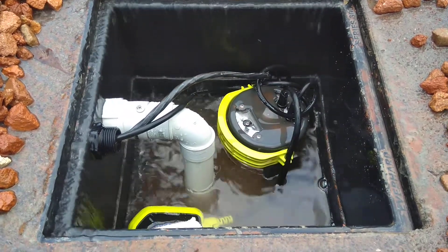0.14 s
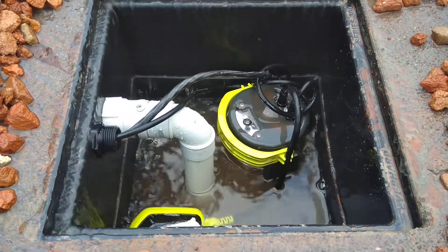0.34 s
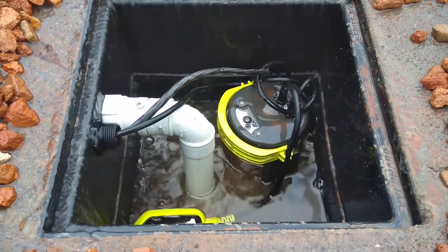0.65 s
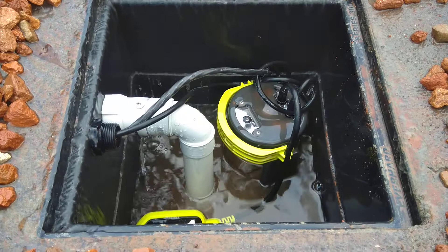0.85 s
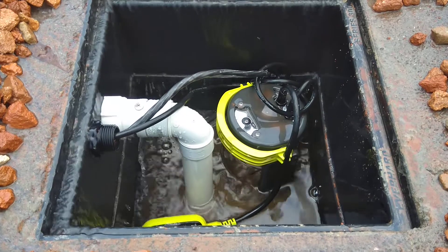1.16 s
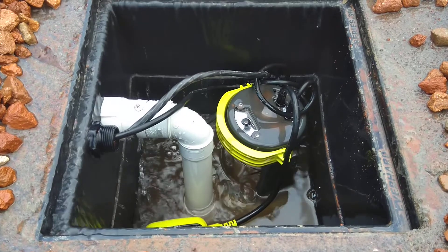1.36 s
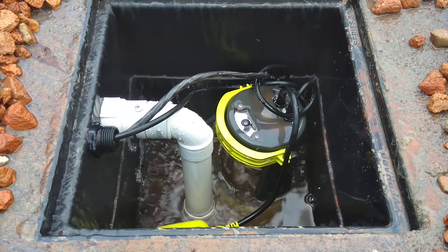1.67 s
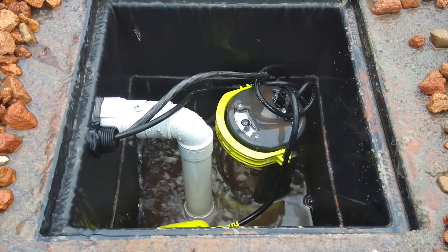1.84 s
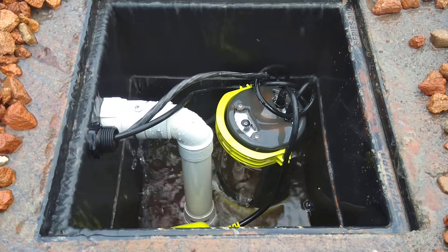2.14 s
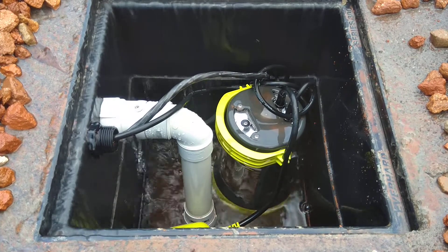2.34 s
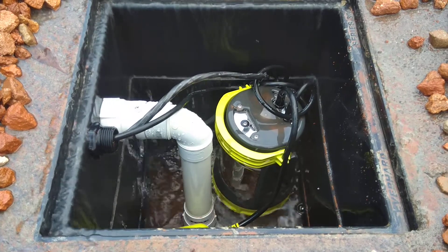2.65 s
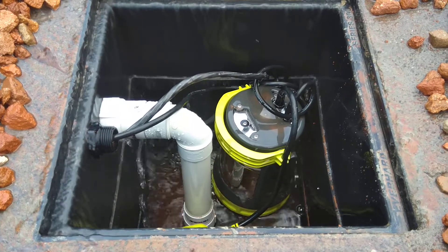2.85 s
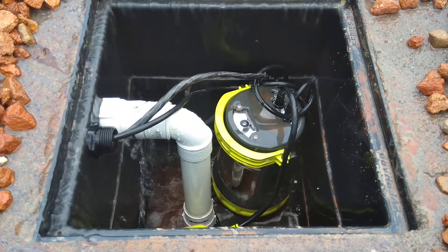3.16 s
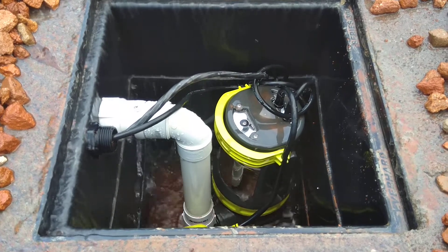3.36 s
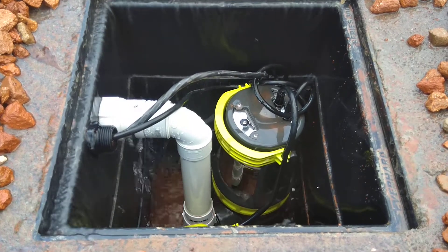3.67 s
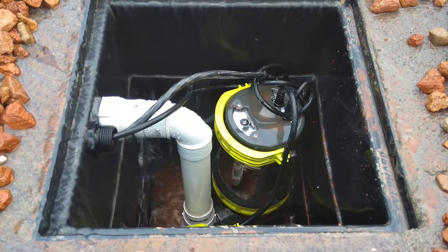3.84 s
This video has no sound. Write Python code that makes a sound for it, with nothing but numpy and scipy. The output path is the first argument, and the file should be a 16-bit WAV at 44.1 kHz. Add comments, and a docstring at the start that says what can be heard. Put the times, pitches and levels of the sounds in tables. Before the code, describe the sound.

A submersible pump drains a narrow pit: low wavering hum, steady watery rush, hiss and spitting drops, occasional deep gurgles, then gulping air and a wet rattle at the end; close stereo microphones above.

```python
"""Pump emptying a pit

A submersible pump empties a narrow concrete pit, heard from above by a close pair of microphones.
The impeller hums as wavering sines and the pit booms as resonant noise, louder as the water sinks.
Churned water rushes in flickering noise bands; big bubbles gurgle as rising rings, small drops spit
as short noisy rings. At the end the inlet gulps air: the hum drops, a wet rattle starts."""
import sys
import numpy as np
from scipy import signal
from scipy.fft import rfft, irfft
from scipy.io import wavfile

SR = 44100
rng = np.random.default_rng(int(sys.argv[2]) if len(sys.argv) > 2 else 0)


def volts_from_decibels(level):
    """Turn decibel levels (scalar or array-like) into linear amplitude factors."""
    exponent = np.asarray(level, float) / 20
    return 10 ** exponent


def dump(signal):
    """Clip the signal to [-1, 1] and save it as 16-bit WAV at the path in sys.argv[1]."""
    limited = np.clip(np.atleast_2d(signal).T, -1, 1)
    pcm = np.round(limited * 32767).astype(np.int16)
    wavfile.write(sys.argv[1], SR, pcm)


N = 176400

# Spectrum of the low rush of water. Each row: frequency in Hz, relative density in dB per Hz.
RUSH_SPECTRUM = [(180, -31), (300, -10.5), (383, -9), (510, -6.5), (668, -5), (988, -3), (1230, -9),
                 (1590, -6.5), (2400, -23), (3120, -21), (5280, -120)]
# Spectrum of the fizz near 3 kHz. Each row: frequency in Hz, relative density in dB per Hz.
FIZZ_SPECTRUM = [(1180, -59), (2000, -1.5), (2410, 1), (2980, 1.5), (3240, 4), (4300, 6.5), (5590, -17),
                 (9460, -120)]
# Spectrum of the hiss of water. Each row: frequency in Hz, relative density in dB per Hz.
HISS_SPECTRUM = [(2350, -19), (4000, -9.5), (4760, -3), (5220, -7.5), (6700, -5.5), (7660, -33),
                 (8910, -8.5), (10100, -17), (13200, -0.5), (15100, -15.5), (16000, -17)]
# Lead of the left microphone over the right. Each row: frequency in Hz, lead in seconds.
LEFT_LEAD_S = [(60, .00008), (170, .0002), (600, .00023), (1100, .00025), (2000, .00039), (15000, .00038)]


def rms_one(x):
    """Scale to rms 1."""
    return x / np.sqrt(np.mean(x ** 2) + 1e-20)


def in_time(rows):
    """Columns of a curve table at every sample."""
    s, *columns = np.transpose(rows)
    return [np.interp(np.arange(N) / SR, s, c) for c in columns]


def at_hz(points, hz):
    """Read a table on a log-frequency axis."""
    table_hz, values = np.transpose(points)
    return np.interp(np.log(hz), np.log(np.maximum(table_hz, 1)), values)


def drift(rate_hz):
    """Slow random curve of rms 1: noise at SR / 40 through a two-pole low-pass, interpolated."""
    r = np.exp(-80 * np.pi * rate_hz / SR)
    noise = rng.standard_normal(N // 40 + 2002)
    slow = signal.lfilter([1], [1, -2 * r, r * r], noise)[2000:]  # settled part
    return np.interp(np.arange(N) / 40, np.arange(len(slow)), rms_one(slow))


def resonance(x, hz, width_hz):
    """Two-pole resonance."""
    r = np.exp(-np.pi * width_hz / SR)
    poles = [1, -2 * r * np.cos(2 * np.pi * hz / SR), r * r]
    return signal.lfilter([1 - r, 0, r - 1], poles, x + 1e-18)


def pair(near, apart=0):
    """Two microphones: the direct share reaches the left first, the rest is unrelated; balance by pitch."""
    # Power share from the water's side. Each row: frequency in Hz, share.
    direct_share = [(60, 1.), (250, 0.97), (500, 0.94), (1000, 0.69), (2000, 0.057), (4500, 0.057),
                    (8000, 0.023), (15000, 0.042)]
    # Balance of the microphones. Each row: frequency in Hz, left minus right in dB.
    left_minus_right_db = [(60, 0), (125, .5), (250, 1.7), (500, 4), (1000, 4.3), (2000, 3.3), (4000, 2.4),
                           (8000, -.2), (15000, .4)]
    hz = np.maximum(np.arange(N // 2 + 1) * SR / N, 1)
    share = np.clip(at_hz(direct_share, hz), 0, 1) if np.ndim(apart) else 1
    lag = np.exp(-2j * np.pi * hz * at_hz(LEFT_LEAD_S, hz) * np.array([[0], [1]]))
    both = np.sqrt(share) * rfft(near) * lag
    both = both + np.sqrt(1 - share) * rfft(apart + np.zeros((2, N)))
    return irfft(both * volts_from_decibels(at_hz(left_minus_right_db, hz) * np.array([[.5], [-.5]])), N)


def banded_noise(spectrum, patchy_db, shared, surge_db=0):
    """Noise bands about a third-octave wide, flickering partly together, surging apart; rms 1."""
    out, together = 0, drift(14.0)
    low_hz, high_hz = max(spectrum[0][0], 20), min(spectrum[-1][0], 18000)
    edges = np.geomspace(low_hz, high_hz, int(3 * np.log2(high_hz / low_hz)) + 2)
    white = rng.standard_normal((2, 3, N))  # neighbouring bands use different noise
    for k, (low, high) in enumerate(zip(edges, edges[1:])):
        band_pass = signal.butter(2, [low, high], "band", fs=SR, output="sos")
        band = signal.sosfilt(band_pass, white[k % 2])
        flicker_db = patchy_db * (shared * together + drift(27.0))
        level_db = at_hz(spectrum, np.sqrt(low * high)) + flicker_db + surge_db * drift(3.6)
        out = out + band * volts_from_decibels(level_db)
    return rms_one(pair(out[0], out[1:]))


def grains(per_s, low_hz, high_hz, cycles, spread_db, spectrum):
    """Random bubbles ringing a few cycles at 20 pitches spread over a range; rms 1."""
    sizes = volts_from_decibels(spread_db * np.minimum(rng.exponential(1, N), 3)) * rng.choice([-1, 1], N)
    born = rng.random(N) < per_s * volts_from_decibels(3.0 * drift(8.0)) / SR
    dealt, out = rng.integers(0, 20, N), 0
    for k, hz in enumerate(np.geomspace(low_hz, high_hz, 20)):
        ring = resonance(sizes * born * (dealt == k), hz, 0.87 * hz / cycles)
        out = out + volts_from_decibels(at_hz(spectrum, hz)) * np.sqrt(hz) * ring
    return rms_one(out)


def rings(x, flicker_db=0):
    """Parallel resonances of pipe and pit, each swelling and fading on its own by flicker_db."""
    # Pipe and pit rings. Each row: frequency in Hz, width in Hz, relative level in dB.
    pit_rings = [(518, 160, -0.5), (765, 41, -1.5), (1037, 100, -1), (1336, 95, 0.5), (1620, 180, -5),
                 (2408, 73, -13)]
    out = 0
    for k, (hz, width_hz, db) in enumerate(pit_rings):
        gain = (-1) ** k * volts_from_decibels(db + flicker_db * drift(5.2)) / np.sqrt(width_hz)
        out = out + gain * resonance(x, hz, width_hz)
    return out


def pit(x):
    """Short flutter between the close walls, other paths for each side."""
    hz = np.arange(N // 2 + 1) * SR / N
    lags_s = rng.uniform(.002, .007, (2, 5, 1))
    # t60 0.05 s at low frequencies, shorter in the treble
    loop = volts_from_decibels(-60 * lags_s / .05) * np.exp(-2j * np.pi * hz * lags_s) / (1 + 1j * hz / 9000)
    echoes = np.sum(loop / (1 - loop), axis=1) * hz / (hz + 700)
    return volts_from_decibels(-7) * irfft(rfft(x) * echoes, N) / 2


def rumble():
    """Low noise bands of varying level over a steady deep bed."""
    # Low rumble. Each row: frequency in Hz, relative density in dB per Hz.
    low_spectrum = [(90, -25), (120, -5.5), (150, 0), (250, -4.5), (330, -9), (450, -55)]
    # Its course. Each row: time in seconds, level in dB.
    low_course = [(0.0, -29.5), (0.12, -35.5), (1.54, -28), (1.85, -29.5), (2.24, -26), (2.57, -27.5),
                  (4.0, -37)]
    # Deep rumble. Each row: frequency in Hz, relative density in dB per Hz.
    deep_spectrum = [(20, -26), (40, -11), (60, -2), (80, -3.5), (110, 0.5), (140, -2)]
    out = volts_from_decibels(in_time(low_course)[0]) * banded_noise(low_spectrum, patchy_db=2.2, shared=.5)
    return out + volts_from_decibels(-37.5) * banded_noise(deep_spectrum, patchy_db=1.5, shared=0.28, surge_db=1.0)


def churned_water(low_db, mid_db, high_db):
    """Rush, fizz and hiss as flickering noise; rush and fizz also surge slowly band by band."""
    surge_db = 1.94
    out = volts_from_decibels(low_db) * banded_noise(RUSH_SPECTRUM, patchy_db=2.0, shared=0.81, surge_db=surge_db)
    out += volts_from_decibels(mid_db) * banded_noise(FIZZ_SPECTRUM, patchy_db=3.5, shared=0.18, surge_db=surge_db)
    return out + volts_from_decibels(high_db) * banded_noise(HISS_SPECTRUM, patchy_db=1.48, shared=0.74)


def ringing_rush(low_db):
    """Rush heard through the pipe and pit rings: white noise into the resonances."""
    return volts_from_decibels(low_db - 6) * rms_one(rings(rng.standard_normal(N), flicker_db=3))


def gurgles(low_db):
    """Small bubbles: random rings in the rush band."""
    return volts_from_decibels(low_db - 7) * grains(150, 362, 2360, cycles=24.6, spread_db=3.0, spectrum=RUSH_SPECTRUM)


def spits(mid_db, high_db):
    """Droplets and fine crackle: short random rings in the fizz and hiss bands."""
    spit_db = -7.5  # against the fizz or hiss
    droplets = grains(160, 3660, 7120, cycles=14.5, spread_db=8.0, spectrum=HISS_SPECTRUM)
    crackle = grains(500, 7000, 14000, cycles=4.0, spread_db=4.0, spectrum=HISS_SPECTRUM)
    lower = grains(95, 2460, 4860, cycles=27.0, spread_db=3.5, spectrum=FIZZ_SPECTRUM)
    return volts_from_decibels(high_db + spit_db) * droplets + volts_from_decibels(high_db - 8) * crackle + volts_from_decibels(mid_db + spit_db) * lower


def squeaks():
    """Air squeezing through the water: narrow glides, their level wavering at random."""
    # Each row: start in seconds, length in seconds, peak in dB before the waver, from Hz, to Hz.
    glides = [(.8, 0.11, -37.5, 5260, 3980), (1.2, 0.075, -30, 4950, 4590), (3.53, 0.045, -37, 4340, 4120)]
    out, t, waver = 0, np.arange(N) / SR, resonance(rng.standard_normal(N), 60, 150)
    for s, length_s, db, from_hz, to_hz in glides:
        part = np.clip((t - s) / length_s, 0, 1)
        phase = 2 * np.pi * np.cumsum(from_hz + (to_hz - from_hz) * part) / SR
        out = out + volts_from_decibels(db) * np.sin(np.pi * part) * np.sin(phase)
    return out * (1 + 1.2 * rms_one(waver))


def drops():
    """Drops and splashes: each a short noisy ring around its pitch with a broad crack."""
    # Each row: start in seconds, relative level in dB, frequency in Hz,
    # pan in dB (+ left, scaled per side below), noise ring t60 in seconds, crack gain in dB.
    drop_rows = [(0.0158, -8.5, 11700, 5, 0.012, -2), (0.0444, -17.5, 2360, 2, 0.042, 0),
                 (0.0667, -19, 5030, 6, 0.034, -4), (0.2128, -19, 6130, 7, 0.02, 3),
                 (0.3092, 0, 5325, 6.5, 0.028, -5.5), (0.7906, -10.5, 5460, 4, 0.012, -5),
                 (0.8758, -21, 4170, 1.0, 0.028, -4), (0.9365, -16.5, 10120, 0, 0.033, -7),
                 (0.9427, -16, 4400, 2, 0.03, -3), (0.956, -14, 4240, 5, 0.024, 0),
                 (0.998, -11.5, 6080, 11.5, 0.024, -6), (1.017, -19, 4440, 1, 0.038, 6),
                 (1.026, -19, 5540, 13, 0.035, -4), (1.044, -15.5, 4580, 1, 0.035, 5),
                 (1.0584, -23, 4430, -1, 0.03, 8), (1.096, -20, 5490, 13, 0.024, -4),
                 (1.148, -13, 10300, 0.5, 0.023, -4), (1.1896, -24.5, 4900, 5, 0.024, 16.5),
                 (1.285, -15, 2370, 0.5, 0.039, 3), (1.3708, -14.5, 4210, 1, 0.027, -6),
                 (1.403, -19, 4720, 0, 0.021, 6.5), (1.529, -17, 11100, 5, 0.028, 0),
                 (1.5795, -11, 7750, -3, 0.016, -2), (1.6109, -9.5, 4070, 7.5, 0.037, -8),
                 (1.7833, -32, 4090, 1, 0.024, 20), (1.923, -11.5, 2790, 2.5, 0.031, -4),
                 (1.9397, -8, 4800, 1, 0.027, -12), (2.229, -19, 4230, 5, 0.068, 1),
                 (2.2584, -7.5, 3240, 2.5, 0.03, 1), (2.262, 6, 4450, 8.5, 0.01, -28),
                 (2.2923, -21.5, 4080, 13.5, 0.03, -11), (2.317, -21, 4440, 11, 0.026, -2),
                 (2.379, -19, 4190, 12, 0.03, -1), (2.4627, -16, 4530, 5.5, 0.03, 1),
                 (2.5674, -12.5, 4600, 4, 0.031, -5), (2.661, -15, 4390, 5, 0.027, -1),
                 (2.7273, -20, 3350, 4, 0.03, 3), (2.937, -15.5, 4670, 0.0, 0.027, 6),
                 (3.097, -27, 4650, 1, 0.02, 18), (3.162, -3.5, 5140, 0, 0.027, 1.5),
                 (3.244, -19, 3300, 12, 0.039, -2), (3.2947, 1, 5620, -3, 0.011, -4),
                 (3.8792, -16, 2520, -2, 0.064, -3), (3.961, -14, 2430, -1, 0.058, -6),
                 (3.8757, -11.5, 3180, 9, 0.044, -6), (3.898, -8, 4390, 3, 0.076, -19),
                 (3.9122, -11.5, 2360, 1, 0.059, -1), (3.9611, -1.5, 5260, 1, 0.031, -6),
                 (3.968, -6, 5130, -1, 0.048, -3), (3.9944, -19.5, 10400, 3, 0.025, 11)]
    width, swell_s, crack_t60_s = 0.15, 0.0004, 0.0037  # width as a share of the pitch
    out, t = np.zeros((2, N + SR)), np.arange(SR // 10) / SR
    noises = rng.standard_normal((len(drop_rows), len(t)))
    for (s, db, hz, pan_db, t60_s, crack_db), noise in zip(drop_rows, noises):
        ring = rms_one(resonance(resonance(noise, hz, width * hz), hz, 2 * width * hz))
        crack = volts_from_decibels(crack_db - 60 * t / crack_t60_s) * resonance(noise, 6900, 11600)
        tone = .9 * np.sin(2 * np.pi * hz * t) * volts_from_decibels(-30 * t / t60_s)  # dies faster than the noise
        decay = volts_from_decibels(-60 * t / t60_s) * (1 - np.exp(-t / swell_s))
        burst = (tone + .45 * ring) * decay + crack
        for side, lag_s, pan_scale in ((0, 0.0024, 0.7), (1, LEFT_LEAD_S[-1][1], -0.88)):
            i = int((s + lag_s) * SR)
            out[side, i:i + len(t)] += volts_from_decibels(db - 2.0 + pan_scale * pan_db) * burst
    return out[:, :N]


def gulps():
    """Each is a bubble rising in pitch, a weaker neighbour just after, and a slap that rings the pipe."""
    # Big bubbles bursting. Each row: start in seconds, relative level in dB, starting pitch in Hz,
    # relative level of the surface slap in dB.
    bursts = [(.616, -17, 1210, -19.5), (.757, -24, 616, -18.5), (.765, -18, 1750, -13),
              (.867, -13, 690, -21), (1.396, -12, 626, -21), (1.408, -20, 1110, -17),
              (1.484, -3.5, 272, -32), (1.485, -9.5, 512, -16), (1.495, -15, 885, -28),
              (1.5, -11.5, 344, -26), (1.51, -17, 666, -32), (1.796, -15, 517, -19), (1.987, -16, 575, -23),
              (2.171, -1, 477, -35), (2.181, -6, 577, -35), (2.199, -8, 680, -22), (2.265, -10, 1580, -39),
              (2.265, -12.5, 700, -8.5), (2.268, -11.5, 260, -9), (2.979, -25, 1280, -11.5),
              (2.988, -25, 600, -10), (3.241, -16, 1190, -34), (3.711, -15, 790, -25),
              (3.78, -5.5, 485, -10.5), (3.796, -10, 478, -31), (3.822, -9.5, 895, -15),
              (3.878, -8, 930, -11.5), (3.879, -11, 1360, -33), (3.899, -7, 1310, -35),
              (3.901, -11, 757, -8), (3.912, -11, 670, -27), (3.919, -11, 940, -17),
              (3.923, -12.5, 327, -28), (3.936, -16, 810, -28), (3.946, -20, 475, -34),
              (3.959, -8, 1620, -25), (3.961, -7, 980, -11), (3.975, -0.5, 1290, -14),
              (3.98, -12, 443, -26), (3.989, -22, 690, -22), (3.995, -10, 320, -37)]
    cycles_to_60db = 17  # at 600 Hz
    rise, swell_cycles, spread_s, slap_t60_s = 0.053, 1.5, 0.0078, 0.013
    out, slaps, t = np.zeros(N + SR), np.zeros(N + SR), np.arange(SR // 8) / SR
    draws = rng.random((len(bursts), 2))
    noises = rng.standard_normal((len(bursts), len(t)))
    for (s, db, hz, slap_db), draw, noise in zip(bursts, draws, noises):
        neighbour = (draw[0] * spread_s, hz * (1.07 + .16 * draw[1]), db - 9)
        for late_s, f, level_db in ((0, hz, db), neighbour):
            swell = 1 - np.exp(-t * f / swell_cycles)
            shape = swell * volts_from_decibels(-60 * t * np.sqrt(f * 600) / cycles_to_60db)
            tone = np.sin(2 * np.pi * f * (t + rise * t * t * f / cycles_to_60db))
            i = int((s + late_s) * SR)
            out[i:i + len(t)] += volts_from_decibels(level_db + 5.5) * shape * tone
        i = int(s * SR)
        slaps[i:i + len(t)] += volts_from_decibels(slap_db - 60 * t / slap_t60_s) * noise
    return out[:N] + volts_from_decibels(39.5) * rings(slaps[:N])


def inlet_rattle():
    """Wet rattle of air and water in the inlet: random knocks through the rings and a broad resonance."""
    # Each row: time in seconds, level in dB of the part through the rings.
    rattle_course = [(3.865, -50), (3.885, -27), (3.93, -24), (3.952, -28), (3.965, -23), (4.0, -22)]
    knocks = (rng.random(N) < 2500 / SR) * rng.standard_normal(N) ** 3  # 2500 per s
    broad = rms_one(resonance(resonance(knocks, 850, 1000), 870, 1400))
    return volts_from_decibels(in_time(rattle_course)[0]) * (rms_one(rings(knocks)) + 0.37 * broad)


def pump():
    """Impeller vane tone, its unsteady half-pitch undertone, mains lines and the boom of the pit."""
    # Vane tone. Each row: time in seconds, level in dB.
    hum_course = [(0.0, -36), (0.09, -30), (0.25, -36.5), (0.33, -26.5), (0.61, -24), (0.71, -36),
                  (0.88, -22), (1.32, -24), (1.38, -38), (1.42, -24.5), (1.59, -47), (1.71, -36),
                  (1.78, -23), (2.47, -25), (2.55, -31.5), (2.61, -19), (2.74, -18), (2.81, -19),
                  (2.99, -17), (3.34, -13), (3.38, -16.5), (3.53, -15), (3.64, -12.5), (3.71, -18),
                  (3.75, -14), (3.86, -18.5)]
    # Half the vane tone. Each row: time in seconds, level in dB.
    undertone_course = [(0.0, -29), (0.19, -42), (0.26, -69), (0.37, -28), (0.78, -51), (1.14, -33),
                        (1.45, -41), (1.66, -27.5), (2.03, -41), (2.22, -28), (2.58, -34), (4.0, -37)]
    # Motor windings. Each row: frequency in Hz, level in dB.
    mains_lines = [(100, -44), (300, -44)]
    # Air column of the pit, shaken by the pump. Each row: time in seconds, level in dB.
    boom_course = [(0.0, -51), (0.1, -17), (0.14, -43), (0.36, -25), (0.41, -35.5), (2.45, -34), (3.1, -21),
                   (3.15, -29.5), (3.78, -24.5), (4.0, -32)]
    vane_hz, waver_hz, waver_db = 171.06, .6, 1.4
    air_in_s, air_in_drop_db = 3.879, -10.5  # the inlet draws air and the tone breaks off
    boom_hz, boom_width_hz = 200.7, 32.5
    t = np.arange(N) / SR
    turn = 2 * np.pi * np.cumsum(vane_hz + waver_hz * drift(4.44)) / SR
    hum_db = in_time(hum_course)[0] + waver_db * drift(16.7)
    hum_db = hum_db + air_in_drop_db * np.clip((t - air_in_s) / 0.0045, 0, 1)
    out = np.sqrt(2) * np.sin(turn) * volts_from_decibels(hum_db)

    under = resonance(rng.standard_normal(N), vane_hz / 2, 3)
    under = rms_one(resonance(under, vane_hz / 2, 31))
    undertone = 0.82 * np.sqrt(2) * np.sin(turn / 2) + 0.41 * under
    out += volts_from_decibels(in_time(undertone_course)[0]) * undertone

    for hz, db in mains_lines:
        out += np.sqrt(2) * volts_from_decibels(db + 1.4 * drift(5.5)) * np.sin(2 * np.pi * hz * t)

    boom = resonance(rng.standard_normal(N), boom_hz, boom_width_hz)
    boom = resonance(boom, boom_hz, 0.99 * boom_width_hz)
    return out + volts_from_decibels(in_time(boom_course)[0]) * rms_one(boom)


def scene():
    """Pump, water and pit together."""
    # Churned water. Each row: time in seconds, level below 2 kHz, near 3 kHz and above 4 kHz in dB.
    churn_course = [(0.0, -33, -39, -31.5), (0.47, -30, -46, -34), (0.69, -31.5, -44, -33),
                    (0.87, -31, -38.5, -34.5), (1.25, -30.5, -40.5, -33.5), (1.47, -29.5, -36.5, -33.5),
                    (1.99, -28.5, -38.5, -34), (2.22, -26, -37.5, -32.5), (2.39, -28, -33.5, -31),
                    (2.9, -28, -32, -32.5), (3.11, -28, -33, -30), (3.75, -27, -30, -30),
                    (3.87, -27.5, -29.5, -34), (4.0, -23, -34, -38)]
    low_db, mid_db, high_db = in_time(churn_course)
    bubbles = gulps() + gurgles(low_db) + ringing_rush(low_db) + inlet_rattle()
    spray = spits(mid_db, high_db) + squeaks()
    splash = drops()
    echoes = pit(bubbles + spray + splash.mean(axis=0))
    background = rumble() + churned_water(low_db, mid_db, high_db)
    return background + echoes + splash + pair(pump() + bubbles + spray)


def top_cut(x):
    """Nothing passes above the cut-off."""
    return signal.sosfilt(signal.butter(12, 16840, fs=SR, output="sos"), x)


def record(dry):
    """Peaks are rounded and the top is cut, 70 dB down from 16.4 kHz."""
    rounded = .95 * np.tanh(dry / .95)
    low_pass = signal.cheby2(12, 70, 16400, fs=SR, output="sos")
    mix = signal.sosfilt(low_pass, rounded)
    return top_cut(mix)


dry = scene()
out = record(dry)
dump(out)
```